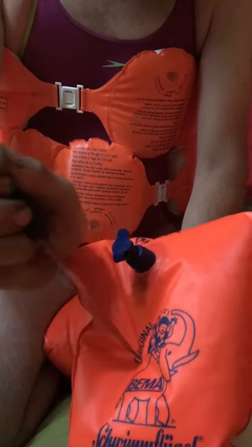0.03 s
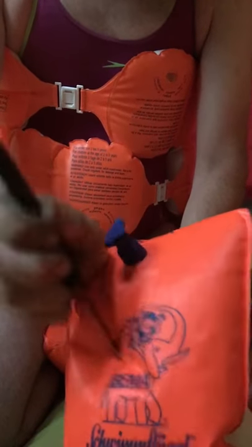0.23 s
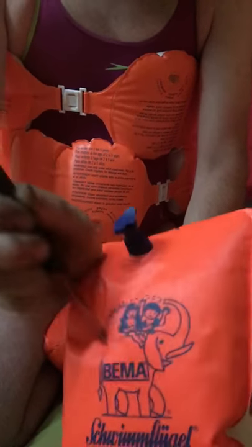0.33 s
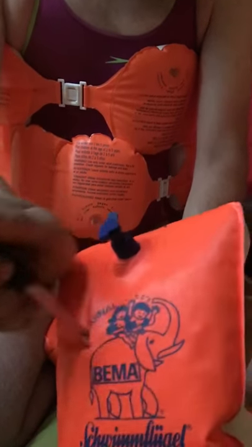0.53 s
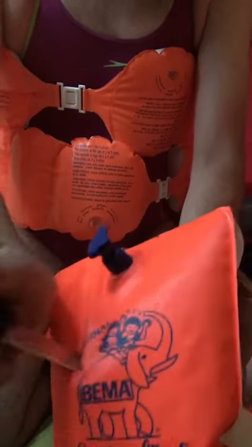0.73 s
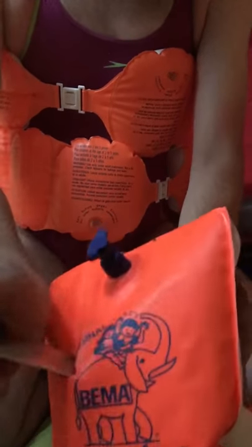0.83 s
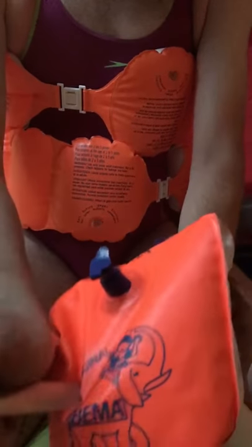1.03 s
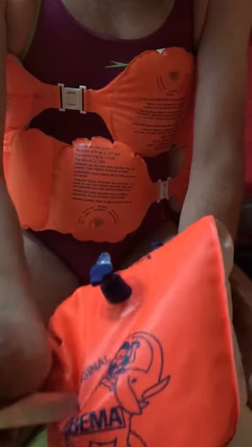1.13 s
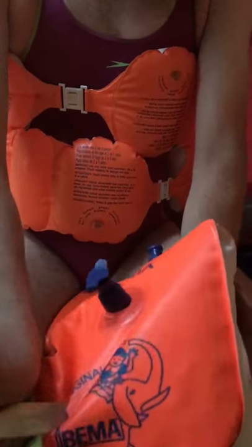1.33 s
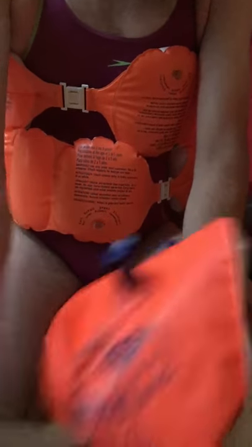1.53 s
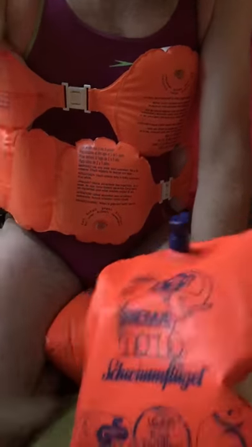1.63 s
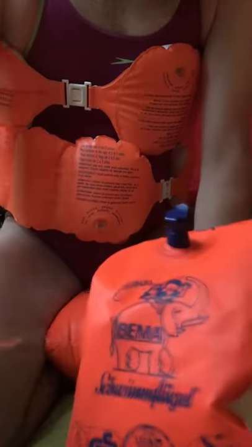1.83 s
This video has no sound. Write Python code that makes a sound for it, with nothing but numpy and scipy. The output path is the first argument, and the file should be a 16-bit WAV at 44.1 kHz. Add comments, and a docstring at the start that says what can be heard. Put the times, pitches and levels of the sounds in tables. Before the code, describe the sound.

A knife stabs an inflated plastic armband with a sharp crack, a hollow thump and a short rasp. The blade drags back with faint ticks and squeaks, then stabs again with less thump, close up in a small room.

```python
"""A knife stabs an inflated vinyl armband twice, close to the microphone in a small room.
At 0.23 s the blade swishes in, the taut skin cracks, the enclosed air thumps like a mass on a spring,
and the blade skids with a short stick-slip rasp. It then drags back over the vinyl with small ticks,
thin squeals and soft bumps. At 1.57 s comes the second stab, with a much weaker thump and a more
pitched rasp, and faint rubbing follows."""
import sys
import numpy as np
from scipy import signal
from scipy.fft import rfft, irfft
from scipy.io import wavfile
from scipy.ndimage import uniform_filter1d

SR = 44100
rng = np.random.default_rng(int(sys.argv[2]) if len(sys.argv) > 2 else 0)


def dump_mix(stems):
    """Bounce the given channels to the path in sys.argv[1] as a 16-bit WAV at rate SR."""
    frames = np.atleast_2d(stems).T  # one column per channel
    limited = np.clip(frames, -1, 1)  # hard clip at full scale
    pcm = np.round(limited * 32767).astype(np.int16)
    wavfile.write(sys.argv[1], SR, pcm)


N = 83790
T = np.arange(N) / SR
HZ = np.fft.rfftfreq(8192, 1 / SR)


def amp(db):
    """Amplitude ratio of a level in decibels."""
    return 10 ** (np.asarray(db) / 20)


def unit(x):
    """Normalisation to an rms of 1."""
    return x / np.sqrt(np.mean(x ** 2) + 1e-20)


def read(points, hz=HZ):
    """Interpolation of a spectrum on a log-frequency axis."""
    f, value = np.transpose(points)
    return np.interp(np.log(hz + 1), np.log(abs(f) + 1), value)


def curve(rows):
    """Linear interpolation of each column of a time table at every sample."""
    times, *columns = np.transpose(rows)
    return [np.interp(T, times, column) for column in columns]


def wander(samples):
    """Random fluctuation of rms 1: a moving average of white noise."""
    return unit(uniform_filter1d(rng.standard_normal(N), size=samples))


def colour(x, db):
    """Minimum-phase filter of relative gains db; white noise keeps its level."""
    log_gain = np.log(amp(np.maximum(db, db.max() - 100)))
    log_response = np.conj(signal.hilbert(np.r_[log_gain, log_gain[-2:0:-1]]))
    taps = np.fft.ifft(np.exp(log_response)).real[:len(HZ)]
    return signal.fftconvolve(x, taps / np.linalg.norm(taps))[:N]


def envelope(start, rise, hold, t60):
    """Linear attack, then exponential damping from start + hold, by 60 dB in t60 seconds."""
    decay = np.exp(-np.log(1000) * np.maximum(T - start - hold, 0) / t60)
    return np.clip((T - start) / rise, 0, 1) * decay


def burst(shape):
    """Broadband transient: noise under an envelope, its spectrum flattened by iteration."""
    x = rng.standard_normal(N)
    for _ in range(4):
        flat = irfft(np.exp(1j * np.angle(rfft(x * shape))), N)
        x = flat / (shape + shape.max() / 20)
    return unit(x * shape) * np.sqrt(np.mean(shape ** 2))


def stabs():
    """Impact excitation: the tip clicks, the taut skin slaps and cracks, the air inside thumps."""
    # (time [s], crack [dB], crack hold [s], crack t60 [s], click [dB], thump [dB], swish [dB],
    # slap [dB], slap frequency [Hz])
    blows = [(0.2345, -9.5, 0.0063, 0.041, -16.5, -7, -22, -5, 887.4),
             (1.5659, -9, 0.0043, .065, -10.5, -27, -31, -11, 605)]
    # spectrum of each crack (frequency [Hz], relative level [dB])
    crack_spectra = [
        [(60, -8), (150, 1.5), (260, 1.5), (360, -19), (500, 0), (620, -16), (800, 0), (1020, -2.5),
         (1250, -14), (1750, -3.5), (2100, -13.5), (2500, -23), (3800, -27), (6300, -26.5), (9000, -44),
         (16000, -44.5)],
        [(60, -20.5), (200, -8), (450, 4), (700, -4), (880, -8), (1130, 4.5), (1400, -12.5), (2000, -3),
         (2700, 0), (3150, -40), (3600, -21), (4000, -13.5), (6300, -22), (9000, -29), (16000, -49)],
    ]
    # spectrum of the tip's click (frequency [Hz], relative level [dB])
    click_spectrum = [(200, -14), (1500, 4), (2600, 3), (3200, -18.5), (4000, -2.5), (6300, -3.5),
                      (9000, -14), (16000, -20)]
    sound = np.zeros(N)
    for blow, crack_spectrum in zip(blows, crack_spectra):
        start, crack_db, hold, t60, click_db, thump_db, swish_db, slap_db, slap_hz = blow
        slap_shape = envelope(start, rise=0.00033, hold=0.0016, t60=0.022)
        slap = amp(slap_db) * slap_shape * np.sin(2 * np.pi * slap_hz * (T - start))
        crack = skin(amp(crack_db) * burst(envelope(start, 0.00072, hold, t60)), crack_spectrum)
        click_shape = envelope(start, rise=0.0002, hold=0.0012, t60=0.028)
        click = skin(amp(click_db) * burst(click_shape), click_spectrum)
        sound += slap + crack + click + thump(start, thump_db) + swish(start, swish_db)
    return sound


def skin(x, spectrum):
    """Membrane resonance: the vinyl adds its peaks and hollows to the spectrum of an excitation."""
    # (frequency [Hz], bandwidth [Hz], gain [dB])
    resonances = [(348.2, 43, 5.5), (436, 52, -6), (480, 220, 5), (575, 52, -4), (666, 90, 7.5),
                  (924, 74, 1), (1003, 70, 3), (1593, 23, 5), (1760, 23, 2), (2047, 140, 2.5),
                  (2646, 150, 2.5), (3920, 700, 5.5), (4487, 160, 3.5), (5490, 220, 5.5), (6290, 190, 4.5)]
    resonance_db = sum(db / (1 + (2 * (HZ - hz) / width) ** 2) for hz, width, db in resonances)
    return colour(x, read(spectrum) + resonance_db)


def thump(impact, db):
    """Damped oscillation of the air cushion; its pitch falls as the stretch relaxes."""
    cushion_hz, stretch_hz, relax_s, lag_s = 68.5, 39, 0.011, 0.0032
    start = impact + lag_s
    age = np.maximum(T - start, 0)
    cycles = cushion_hz * age + stretch_hz * relax_s * (1 - np.exp(-age / relax_s))
    push = envelope(start, rise=0.0015, hold=0.0046, t60=0.045)
    ring = amp(-18) * envelope(start, rise=0.0057, hold=0.004, t60=0.33)
    return amp(db) * (push + ring) * np.sin(2 * np.pi * cycles)


def swish(impact, db):
    """Noise of the approaching blade, growing exponentially up to the impact."""
    # (frequency [Hz], relative level [dB])
    spectrum = [(60, -3.5), (200, 1), (700, -8.5), (2100, -10), (2750, -14.5), (3500, -8), (4200, -8.5),
                (4650, -1), (5500, -21.5), (7500, -43.5), (16000, -54.5)]
    lead_s, growth_db = 0.02, 23.5
    growth = amp(growth_db * np.minimum(T - impact, 0) / lead_s)
    approach = growth * envelope(impact - lead_s, rise=0.01, hold=lead_s, t60=0.023)
    return colour(amp(db) * burst(approach), read(spectrum))


def rasps():
    """Stick-slip friction: each slip of the skidding blade gives a pulse and a puff of noise."""
    # (time [s], duration [s], level [dB], roughness [0-1], rate jitter [fraction], treble swell [dB])
    skids = [(0.243, 0.06, -22, 0.77, .35, -2), (1.578, 0.038, -17, 0.31, .06, 7.5)]
    # course of each skid (time [s], slip rate [Hz])
    slip_rates = [
        [(.25, 210), (.28, 230.8), (.307, 298.5)],
        [(1.576, 480.9), (1.585, 350.4), (1.593, 279.5), (1.601, 343), (1.610, 459.7), (1.622, 525.3)],
    ]
    # spectrum of each skid (frequency [Hz], relative level [dB])
    spectra = [
        [(60, -14), (150, -1.5), (300, -4), (430, -8.5), (750, -9), (1200, -10), (1900, -11), (2700, -19),
         (3300, -22), (4500, -26.5), (7000, -34), (10000, -39.5), (16000, -47.5)],
        [(60, -10), (200, -14.5), (275, -4), (380, -4), (520, -12), (670, -10.5), (1150, -10), (1700, -16),
         (2600, -16.5), (3200, -27.5), (4200, -27.5), (5500, -29.5), (16000, -48.5)],
    ]
    crossover_hz, snatch_s = 2310, 0.0037
    low, high = (signal.butter(2, crossover_hz, kind, fs=SR, output="sos") for kind in ("low", "high"))
    sound = np.zeros(N)
    for (start, length, db, rough, jitter, swell_db), rates, spectrum in zip(skids, slip_rates, spectra):
        rate = curve(rates)[0] * np.exp(jitter * wander(90))
        cycles = np.cumsum(rate) / SR
        slips = np.diff(np.floor(cycles), prepend=0) * np.sqrt(SR / rate)
        slip_db = 0.5 * rough * np.clip(rng.standard_normal(N), -2, 2)
        strength = unit(amp(slip_db)[cycles.astype(int)])  # one value per slip
        puffs = unit((0.38 + np.exp(-(cycles % 1) / 0.36)) * rng.standard_normal(N))
        body = signal.sosfilt(low, np.sqrt(rough) * puffs - np.sqrt(1 - rough) * slips)
        # a last snatch as the blade lets go
        snatch_db = 5.5 * (1 - rough) * np.exp(-((T - start - length) / snatch_s) ** 2)
        progress = np.clip((T - start) / length, 0, 1)
        treble = amp(swell_db * (progress - 0.65) + snatch_db) * signal.sosfilt(high, puffs)
        shape = envelope(start, rise=0.0013, hold=length, t60=0.047)
        sound += skin(amp(db) * strength * (body + treble) * shape, spectrum)
    return sound


def ticks():
    """Impulsive release: the blade catches and lets go with a snap and a little crinkle."""
    # (time [s], body level [dB], treble level [dB])
    catches = [(0.052, -52.5, -63), (.2145, -34.5, -56.5), (0.375, -36.5, -54), (0.389, -43, -72),
               (0.44, -48, -63), (0.62, -42.5, -57), (0.637, -37.5, -45), (0.698, -53, -57),
               (.745, -40.5, -50), (0.769, -54, -69), (0.79, -46.5, -53), (0.857, -45.5, -56),
               (.889, -45.5, -54), (.912, -46, -53.5), (0.941, -48.5, -55.5), (0.974, -46, -55),
               (1.038, -41, -52.5), (1.174, -43.5, -52), (1.370, -49, -74), (1.492, -49.5, -78),
               (1.853, -57, -67.5)]
    # spectra of the two bands (frequency [Hz], relative level [dB])
    body_spectrum = [(100, -5), (500, -6), (1700, 5), (2600, -2.5), (3400, -12), (6000, -31.5),
                     (16000, -51)]
    treble_spectrum = [(100, -27), (2500, -14.5), (4000, 0), (5500, 3.5), (9000, -10), (16000, -18)]
    body, treble = np.zeros((2, N))
    crinkle = amp(-7) * rng.standard_normal(N)
    for start, body_db, treble_db in catches:
        tick = crinkle * envelope(start, rise=0.00061, hold=0.001, t60=0.027)
        tick[round(start * SR)] += 1  # the snap
        body += amp(body_db) * tick
        treble += amp(treble_db) * tick
    return skin(body, body_spectrum) + skin(treble, treble_spectrum)


def bumps():
    """Damped free vibrations as the armband shifts and buckles."""
    # (time [s], level [dB], frequency [Hz], t60 [s])
    knocks = [(0.053, -43.5, 92, 0.078), (0.057, -46, 236, 0.017), (.622, -43.5, 277.8, 0.027),
              (0.827, -50.5, 67.4, 0.12), (.969, -52, 471, 0.022), (1.015, -45.5, 77.9, 0.44),
              (1.024, -47.5, 364, 0.06), (1.212, -37, 331, 0.018), (1.348, -42.5, 200, 0.034),
              (1.464, -57, 75.3, 0.49)]
    rise_s = 0.003
    return sum(amp(db) * envelope(start, rise_s, rise_s, t60) * np.sin(2 * np.pi * hz * (T - start))
               for start, db, hz, t60 in knocks)


def rubbing():
    """Sliding friction: blade and hand excite the skin with fine grains and surging hiss."""
    # (time [s], body level [dB], treble level [dB])
    levels = [(0, -73, -80), (.19, -73.5, -82), (.30, -28.5, -55), (.325, -47.5, -48), (.36, -54.5, -57.5),
              (.41, -58.5, -72), (.45, -55.5, -67), (.60, -60.5, -66), (.645, -60.5, -68),
              (.67, -64.5, -74), (.75, -53.5, -62.5), (.83, -62, -72), (.88, -70, -74.5), (.96, -65, -78),
              (1.0, -60.5, -70), (1.07, -55, -62), (1.13, -58, -57.5), (1.22, -54, -69), (1.27, -60, -74.5),
              (1.43, -66, -80.5), (1.49, -68, -81), (1.54, -67.5, -72), (1.63, -48.5, -61.5),
              (1.67, -48.5, -55.5), (1.71, -63, -68), (1.77, -66.5, -70.5), (1.85, -58.5, -64.5),
              (1.9, -61.5, -66.5)]
    # spectra of the two bands (frequency [Hz], relative level [dB])
    body_spectrum = [(40, -14), (130, 0.5), (330, 6.5), (450, -2), (900, 1.5), (2100, 3.5), (2700, -3.5),
                     (3500, -10), (6000, -26.5), (16000, -48)]
    treble_spectrum = [(100, -24), (2000, -34.5), (4000, 1.5), (6000, 1.5), (9000, -2.5), (12000, -7),
                       (16000, -16.5)]
    grains_per_s, spread_db, grain_share, surge_db = 1500, 3, 0.3, 1.47
    body_db, treble_db = curve(levels)
    impulses = (rng.random(N) < grains_per_s / SR) * rng.choice([-1, 1], N)
    grains = impulses * amp(spread_db * np.minimum(rng.exponential(1, N), 4))
    friction = np.sqrt(grain_share) * unit(grains) + np.sqrt(1 - grain_share) * rng.standard_normal(N)
    friction *= amp(surge_db * wander(500))
    return skin(amp(body_db) * friction, body_spectrum) + skin(amp(treble_db) * friction, treble_spectrum)


def rumble():
    """Random forcing: the handled air cushion responds at low frequencies."""
    # (time [s], level [dB])
    levels = [(0, -74), (.17, -67.5), (.4, -61), (.55, -58), (.7, -63.5), (.92, -71), (1.08, -55.5),
              (1.25, -62.5), (1.42, -64.5), (1.55, -66.5), (1.62, -45), (1.68, -64.5), (1.78, -60.5),
              (1.9, -76.5)]
    # (frequency [Hz], relative level [dB])
    spectrum = [(20, -23), (45, -4), (62, -9.5), (74, 0.5), (90, -5.5), (130, -6), (200, -18.5),
                (400, -47.5), (2000, -64.5)]
    return colour(amp(curve(levels)[0]) * rng.standard_normal(N), read(spectrum))


def squeals():
    """Friction-induced oscillation: thin, unsteady whistles of the blade that arch and fall."""
    # (time [s], duration [s], top frequency [Hz], level [dB], fall [fraction], second harmonic [dB])
    whistles = [(0.317, .038, 7550, -56.5, 0.54, -2), (0.719, 0.068, 8450, -60, 0.18, -27)]
    top_at, rise_share, waver_share, flutter_db = 0.28, 0.026, 0.0136, 4
    sound = np.zeros(N)
    for start, length, top_hz, db, fall_share, octave_db in whistles:
        progress = np.clip((T - start) / length, 0, 1)
        before_top = np.maximum(1 - progress / top_at, 0)
        after_top = np.maximum((progress - top_at) / (1 - top_at), 0)
        arch = 1 - rise_share * before_top - fall_share * after_top ** 1.2
        phase = 2 * np.pi * np.cumsum(top_hz * (arch + waver_share * wander(40))) / SR
        tone = np.sin(phase) + amp(octave_db) * np.sin(2 * phase)
        shape = np.sqrt(abs(np.sin(np.pi * progress)))
        sound += amp(db + flutter_db * wander(40)) * shape * tone
    return sound


def standing_waves(x):
    """Room modes: low resonances ring on after the blows."""
    # (frequency [Hz], t60 [s], gain at resonance [dB])
    modes = [(70, 0.18, -12), (270.7, .6, -8)]
    response = np.zeros(N)
    for hz, t60, db in modes:
        damping = np.log(1000) / t60
        response += amp(db) * 2 * damping / SR * np.exp(-damping * T) * np.cos(2 * np.pi * hz * T)
    return signal.fftconvolve(x, response)[:N]


def reverberation(x):
    """Diffuse field: a short tail in which each band decays at its own rate."""
    # (frequency [Hz], t60 [s])
    decay_times = [(80, 0.56), (300, 0.36), (1000, .36), (2500, .36), (6000, 0.093), (15000, 0.33)]
    delay_s = 0.0027
    hz, t, bands = signal.stft(rng.standard_normal(SR), SR, nperseg=256)
    decay = np.exp(-np.log(1000) * t / read(decay_times, hz)[:, None])
    tail = signal.istft(bands * decay, SR, nperseg=256)[1][:SR] * (T[:SR] > delay_s)
    return signal.fftconvolve(x, tail / np.linalg.norm(tail))[:N]


def noise_floor():
    """Stationary background noise, faint and mostly low in frequency."""
    # (frequency [Hz], relative level [dB])
    spectrum = [(30, -3.5), (150, 1), (500, -7.5), (2000, -21), (5000, -18.5), (16000, -30)]
    return amp(-71) * colour(rng.standard_normal(N), read(spectrum))


def scene():
    """Superposition of the direct sound, the room's response and the background."""
    direct = stabs() + rasps() + ticks() + bumps() + rubbing() + rumble() + squeals()
    return (direct + noise_floor() + amp(-25) * reverberation(direct) + standing_waves(direct))[None]


def record(dry):
    """Transduction: the microphone's frequency response, clipping at full scale and a band limit."""
    # (frequency [Hz], relative gain [dB])
    response = [(20, -20.5), (36, -5), (55, 2), (2300, -0.5), (2760, -1), (2930, -2.5), (3430, -2),
                (3800, -3.5), (7000, -1), (9300, -2), (10300, -6.5), (11500, -2), (16000, 3)]
    cutoff_hz = 16000
    heard = np.clip(colour(dry[0], read(response)), -1, 1)
    low_pass = signal.firwin(511, cutoff_hz, window=("kaiser", 9), fs=SR)
    return signal.fftconvolve(heard, low_pass, "same")[None]


dry = scene()
out = record(dry)
dump_mix(out)
```